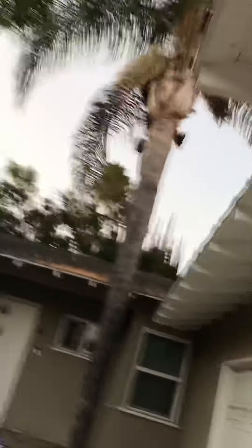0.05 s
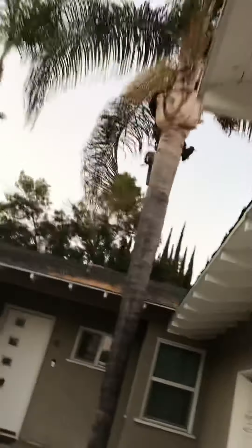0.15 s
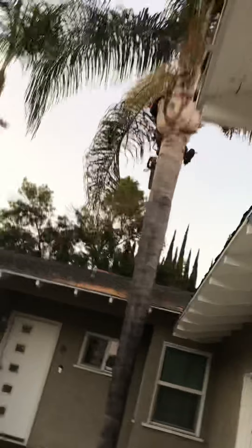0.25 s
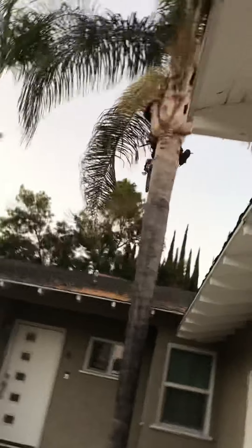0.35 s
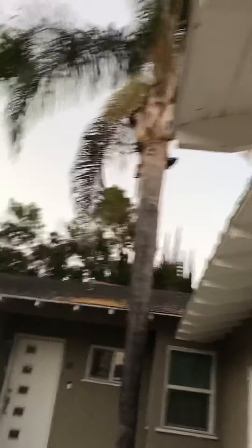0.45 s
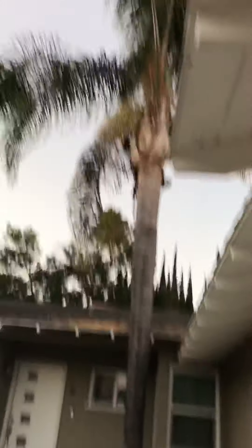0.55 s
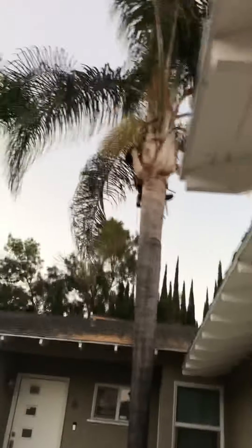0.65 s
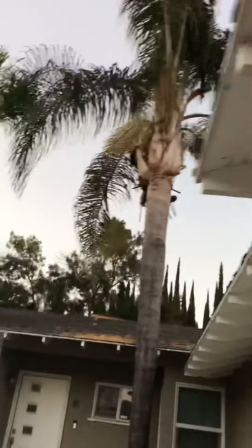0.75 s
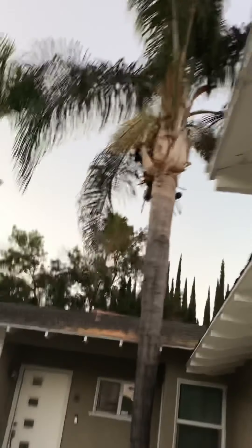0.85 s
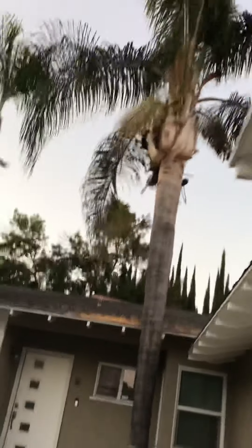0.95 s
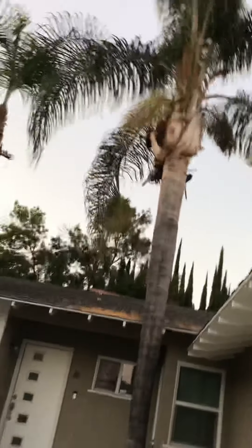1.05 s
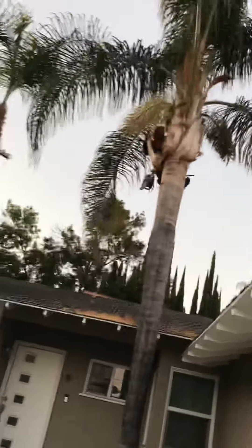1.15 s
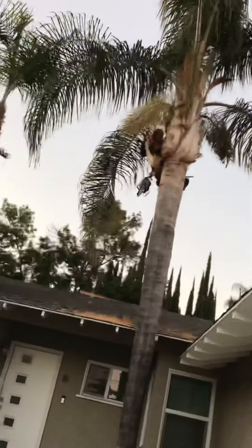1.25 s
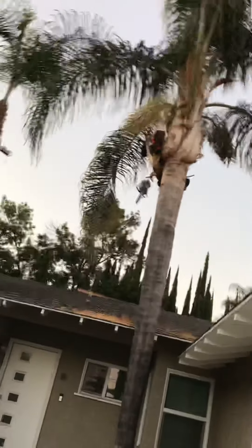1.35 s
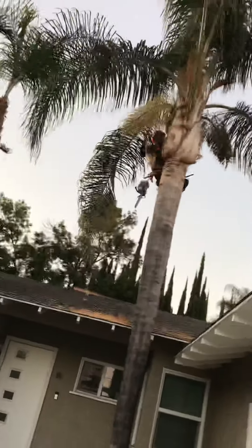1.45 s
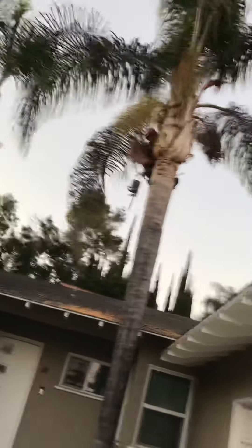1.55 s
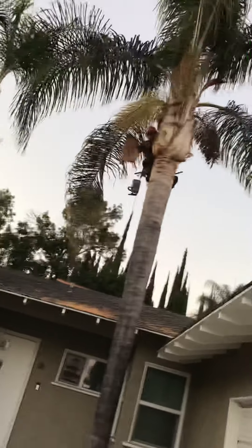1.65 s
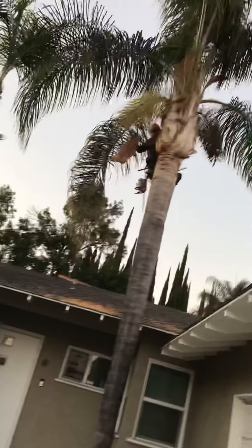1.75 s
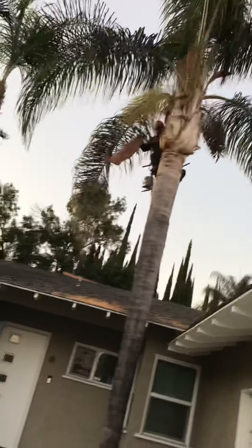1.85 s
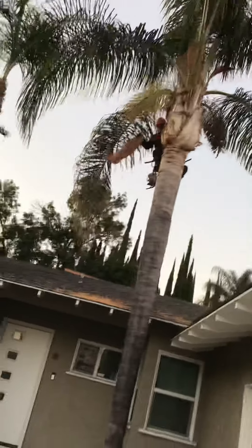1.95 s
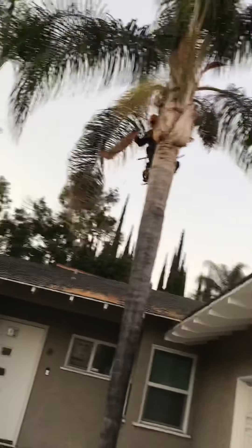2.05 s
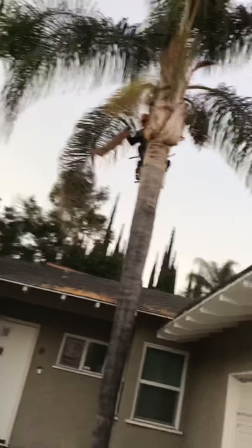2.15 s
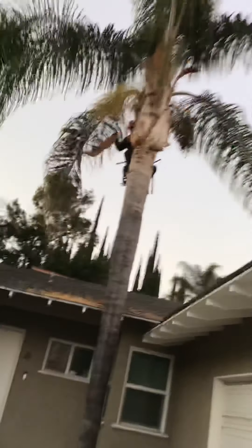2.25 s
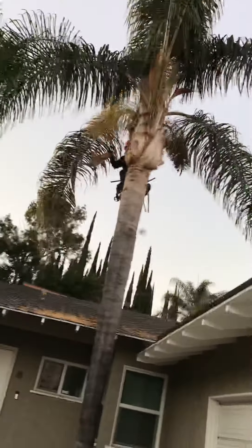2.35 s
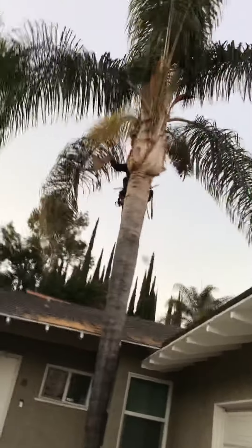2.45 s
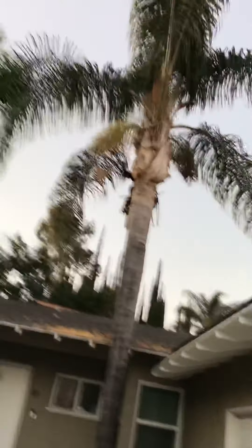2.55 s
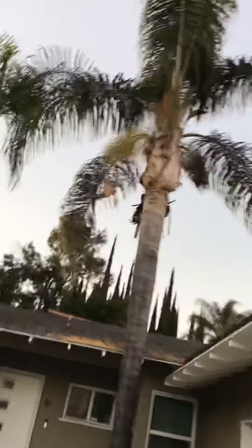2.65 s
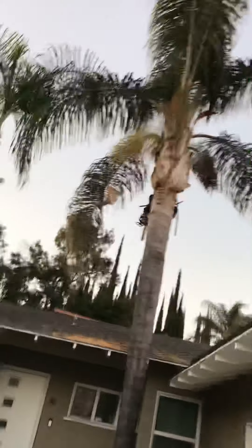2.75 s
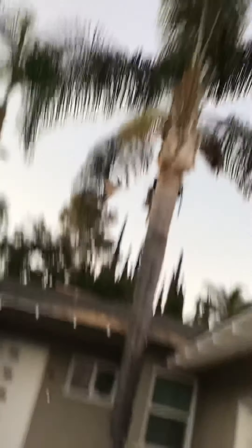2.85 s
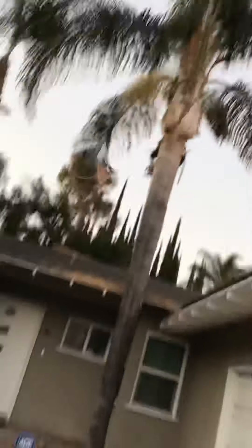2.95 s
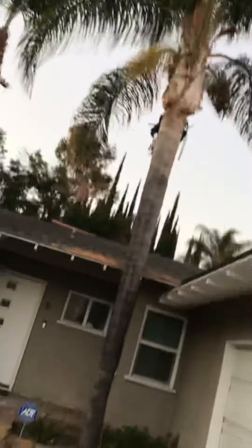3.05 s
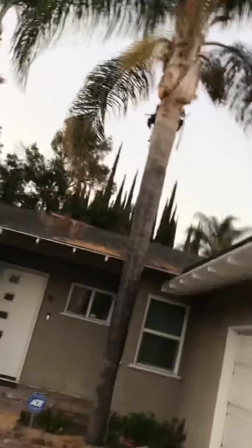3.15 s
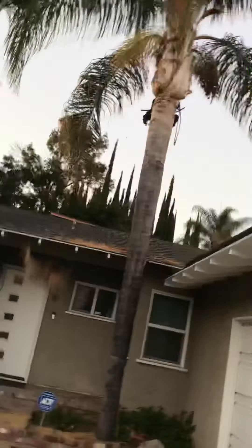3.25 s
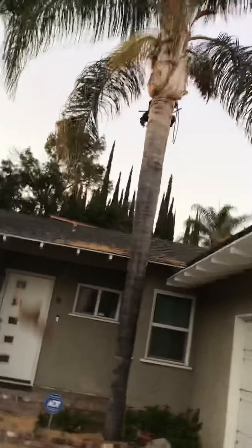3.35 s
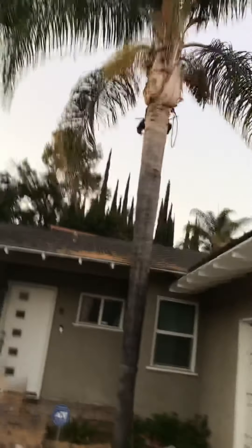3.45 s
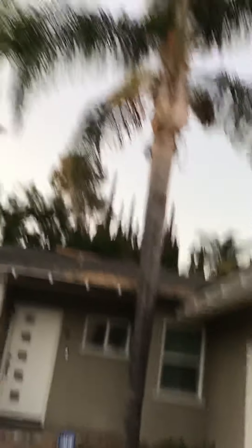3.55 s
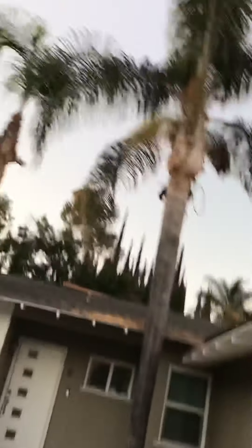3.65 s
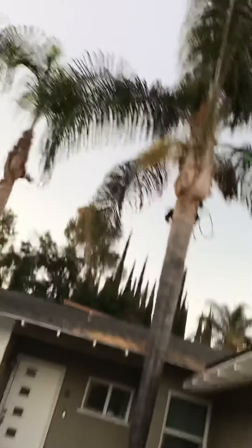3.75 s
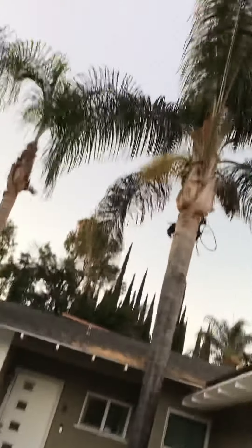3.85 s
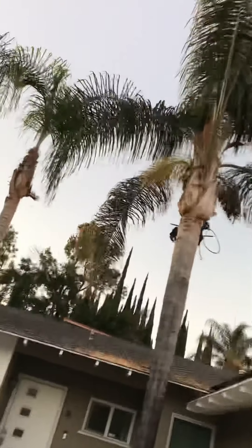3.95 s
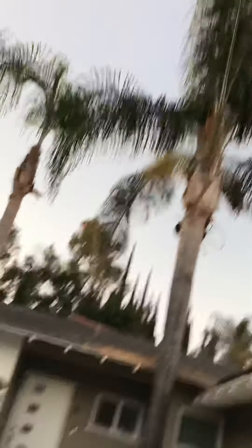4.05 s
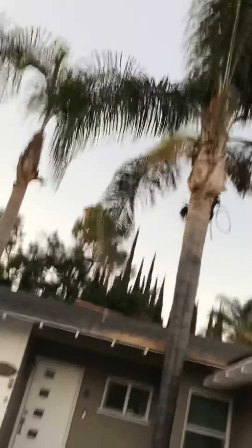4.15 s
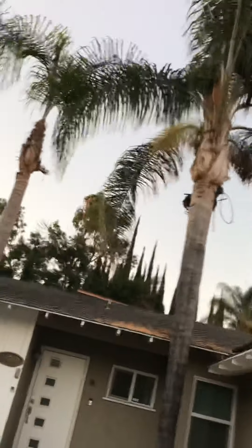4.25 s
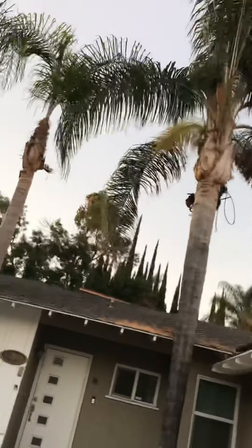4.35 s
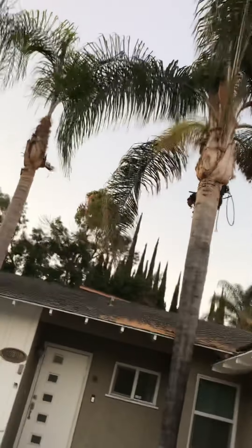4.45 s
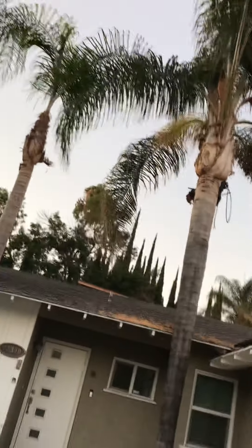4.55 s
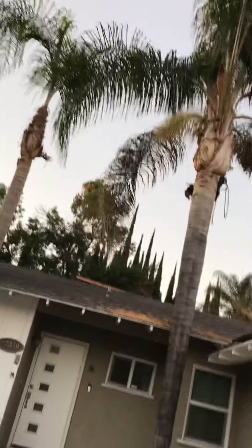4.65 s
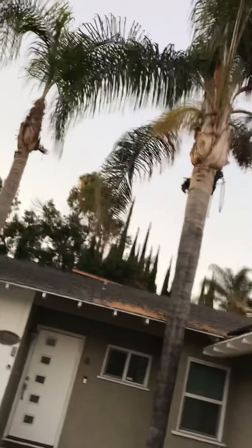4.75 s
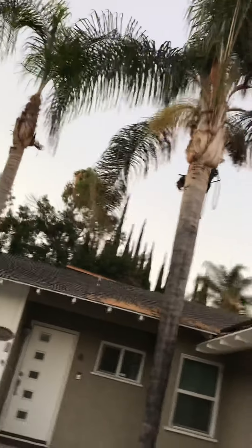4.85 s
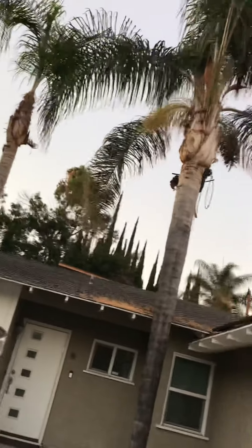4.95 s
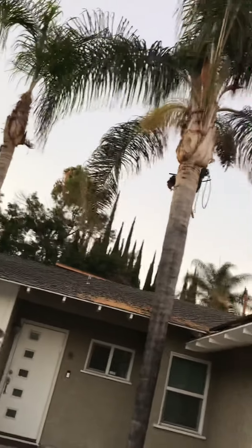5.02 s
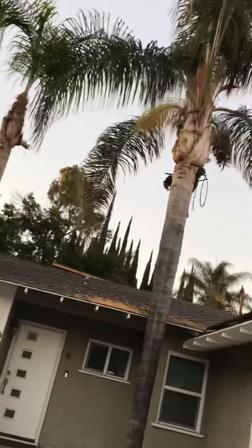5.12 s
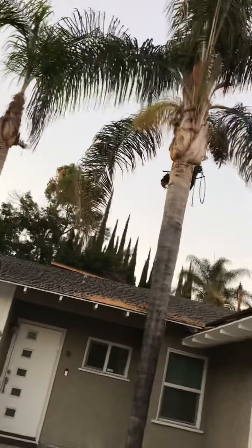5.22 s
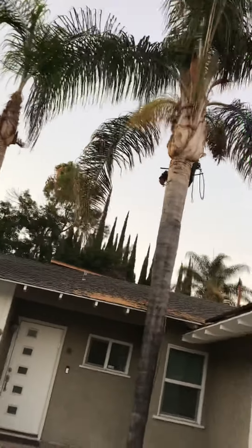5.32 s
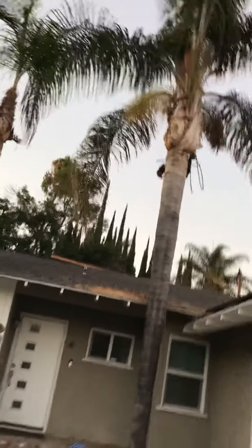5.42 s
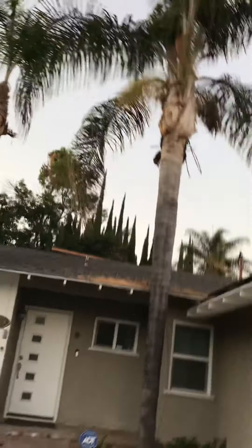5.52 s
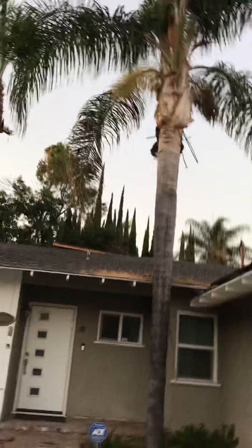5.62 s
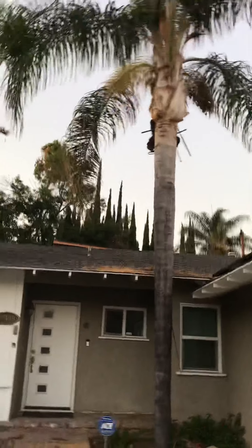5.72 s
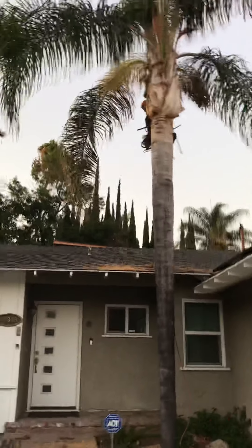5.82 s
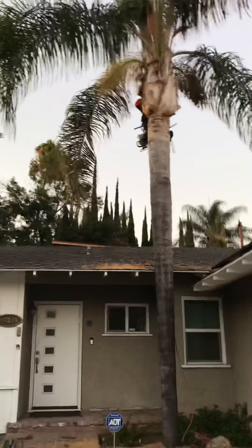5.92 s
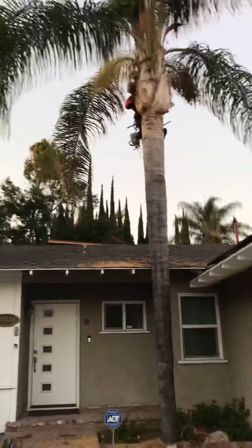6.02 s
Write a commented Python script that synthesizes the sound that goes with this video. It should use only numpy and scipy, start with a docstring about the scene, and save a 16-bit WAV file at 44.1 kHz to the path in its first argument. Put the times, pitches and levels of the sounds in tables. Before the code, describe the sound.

Outdoors in a house yard, a phone hears dry palm leaves hissing and ticking above faint traffic rumble. Fibres scrape and snap sharply as a frond base is torn loose. A very loud, crunchy woody crash lands close by, followed by a hollow bounce thud, leafy rustling that fades, and a few last cracks. Walls return short echoes.

```python
"""Palm frond torn off and dropped

A trimmer high in a palm tears a dry frond base off the trunk: leaves hiss and tick, fibres scrape and snap.
The woody piece crashes down beside a house, bounces with a hollow thud and settles among dry leaves.
Rustle, scrapes, snaps and faint crackles are shaped noise, one crackle being handling or clothing close by;
each blow is a short push, a ringing husk and a noisy crunch.
Walls and eaves throw back short echoes; traffic, made of filtered noise, rumbles far off."""
import sys
import numpy as np
from scipy import signal
from scipy.fft import rfft, irfft
from scipy.io import wavfile

SR = 44100
rng = np.random.default_rng(int(sys.argv[2]) if len(sys.argv) > 2 else 0)


def to_wav(sig):
    """Store sig (one row per channel, or 1-D mono) as 16-bit WAV at the path in sys.argv[1].

    Samples outside -1..1 are clipped; the rate is SR.
    """
    pcm = np.clip(np.atleast_2d(sig), -1, 1) * 32767
    pcm = np.round(pcm).astype(np.int16)
    wavfile.write(sys.argv[1], SR, pcm.T)  # frames by channels


N = 268172
T = np.arange(N) / SR  # time in s
LANDING_S = 3.65  # the crash on the ground

# the frond dragging over bark or ground, its leaflets swishing along; both levels are before flutter
# [height of the stroke t/s, husk level/dB, centre f/Hz, rise t/s, fall t/s, leaflet level/dB]
SCRAPES = [(.019, -59, 1720, 0.069, .049, -49), (.19, -54, 1520, 0.11, 0.054, -49.5),
           (.53, -57, 1550, 0.093, 0.39, -57.5), (.675, -41.5, 890, .022, 0.032, -48),
           (.712, -48.5, 1720, 0.024, 0.061, -42), (.995, -50, 900, 0.016, 0.022, -46.5),
           (1.45, -46.5, 790, 0.046, 0.044, -55), (1.53, -57.5, 3000, 0.099, 0.088, -54.5),
           (2.57, -55, 1000, 0.028, 0.063, -57), (2.668, -63, 1220, 0.02, 0.05, -46),
           (2.897, -47.5, 960, 0.014, 0.024, -42.5), (3.335, -48, 920, .025, 0.024, -59),
           (3.849, -43.5, 990, 0.054, 0.055, -48.5), (3.99, -46.5, 1100, 0.035, 0.057, -41.5),
           (4.2, -39.5, 1260, 0.022, 0.028, -40), (4.569, -56.5, 2070, 0.066, 0.18, -52.5)]


def undb(db):
    """Turn decibels into a plain gain."""
    return 10 ** (np.asarray(db) / 20)


def unit(x):
    """Scale x to an average (RMS) strength of 1."""
    return x / np.sqrt(np.mean(x ** 2))


def curve(rows):
    """Gain over time, drawn through rows of [t/s, level/dB]."""
    return undb(np.interp(T, *np.transpose(rows)))


def add(track, s, x):
    """Mix x into the track at time s, or at its start if s is negative."""
    i = max(int(s * SR), 0)
    track[i:i + len(x)] += x[:max(N - i, 0)]


def colour(x, points):
    """Tone filter through [f/Hz, level/dB] points, scaled to unit power gain; it never sounds early."""
    hz, db = np.transpose(points)
    size = 4096
    log_hz = np.log(np.fft.rfftfreq(size, 1 / SR) + 1)
    gain = unit(undb(np.interp(log_hz, np.log(hz), db)))
    # folding the cepstrum gives a minimum-phase filter: its energy comes as soon as it can
    cepstrum = irfft(np.log(gain))[:size // 2]
    cepstrum[1:] *= 2
    impulse = irfft(np.exp(rfft(cepstrum, size)))
    return signal.fftconvolve(x, impulse)[:len(x)]


def band(x, hz, q):
    """Broad resonance of unit power gain, centred no higher than SR / 3."""
    w = 2 * np.pi * min(hz, SR / 3) / SR
    a = np.sin(w) / (2 * q)
    passed = signal.lfilter([a, 0, -a], [1 + a, -2 * np.cos(w), 1 - a], x)
    return passed * np.sqrt((1 + a) / a)


def dull(x, hz):
    """Soften the treble above hz."""
    return signal.sosfilt(signal.butter(2, min(hz, .45 * SR), fs=SR, output="sos"), x)  # air and foliage


def walk(rate):
    """Random values, rate per second, joined by straight lines; their spread is near 1."""
    step = int(SR / rate)
    count = N // step + 2
    return np.interp(T, np.arange(count) * step / SR, rng.standard_normal(count))


def swell(t, rise, fall):
    """A stroke builds up to t = 0 and dies away."""
    return np.exp(-np.where(t < 0, (t / rise) ** 2, t / fall))


def grains(size, spread_db):
    """Dense noise grains of uneven strength, like micro-fractures."""
    strength = np.clip(rng.standard_normal(size), -2, 2)
    return unit(rng.standard_normal(size) * undb(spread_db * strength))


def fracture(time, spread_db, lead):
    """One sharp break of height lead, then splinters that die away over about time seconds."""
    t = T[:SR // 5]
    fade = np.exp(-t / max(time, 1e-4))
    x = unit(grains(len(t), spread_db) * fade) * np.sqrt(np.mean(fade ** 2))
    x[0] = lead
    return x


def stir():
    """How hard the leaflets move: the breeze, each frond stroke and the settling heap add their power."""
    # faint hiss of the crowns in the air [t/s, level/dB before flutter and trim]
    breeze = [(0, -57), (1.8, -64), (2.6, -63), (3.6, -60.5), (4.85, -71.5), (5.4, -80.5), (5.88, -71),
              (6.08, -60.5)]
    leaf_lag = 1.5  # leaflets swell and calm this many times more slowly than the stroke that moves them
    strokes = 0
    for s, _, _, rise, fall, db in SCRAPES:
        strokes = strokes + (undb(db) * swell((T - s) / leaf_lag, rise, fall)) ** 2
    # the fallen heap is shaken by the crash and comes to rest at rest_s
    heap_db, fall_db_per_s, rest_s = -43.5, 10.5, 4.82
    settling = np.clip((rest_s - T) / 0.14, 0, 1) * (T > LANDING_S)
    heap = settling * undb(heap_db - fall_db_per_s * (T - LANDING_S))
    return np.sqrt(curve(breeze) ** 2 + strokes + heap ** 2)


def leaves():
    """Leaflets brush together in a fluttering hiss, and their dry tips tick at random moments."""
    # tone of the rustle [f/Hz, relative level/dB]
    leaf_tone = [(300, -4.5), (1500, -0.5), (3500, 0), (6500, -4.5), (9000, -5), (10500, -10), (12500, -6),
                 (16000, -11)]
    ticks_per_s, tick_db = 90, -6.5  # tick level is against the hiss
    flutter = undb(1.0 * walk(60))
    tips = (rng.random(N) < ticks_per_s / SR) * rng.uniform(-0.99, 1, N)
    splinters = signal.fftconvolve(tips, fracture(.0006, spread_db=6.0, lead=4.0))[:N]
    ticks = undb(tick_db) * unit(band(splinters, 11000, q=.7) * flutter)
    rustle = colour(rng.standard_normal(N) + ticks, leaf_tone)
    return rustle * flutter * stir() * undb(-0.5)  # slight trim


def traffic():
    """A far-off rumble that wavers slightly, and the sigh of tyres: two kinds of filtered noise."""
    # tone of far traffic [f/Hz, relative level/dB]
    town_tone = [(20, -32), (35, -29), (48, -0.5), (62, 10.5), (85, -4), (125, -2.5), (165, -8),
                 (240, -8.5), (400, -14.5), (650, -16), (1000, -18.5), (1400, -19), (3000, -30),
                 (15000, -43.5)]
    # tyres on a distant road [t/s, level/dB]
    road = [(0, -63.5), (2.5, -64.5), (4.4, -56.5), (5.3, -57.5), (6.08, -56)]
    town = unit(colour(rng.standard_normal(N), town_tone)) * undb(-49.03 + .5 * walk(6))
    tyres = unit(band(band(rng.standard_normal(N), 976, q=1.8), 976, q=1.8))
    return town + tyres * curve(road)


def scrapes():
    """Rough husk catches and slips in swelling strokes of grainy noise."""
    out = np.zeros(N)
    for s, db, hz, rise, fall, _ in SCRAPES:
        t = T[:SR] - .5  # the stroke is at its height at t = 0
        rough = grains(len(t), spread_db=12.0)
        body = undb(-10.5) * band(rough, 372, q=5.2)
        tone = dull(band(rough, hz, q=1.0) + body, 9.0 * hz)
        stroke = undb(db) * swell(t, rise, fall) * tone
        cut = max(int((.5 - s) * SR), 0)  # drop what would come before time 0
        add(out, s - .5, stroke[cut:])
    return out * undb(4.5 * walk(110))  # quick random changes of strength


def snap(hz, time):
    """A sharp crack, as of a breaking fibre bundle; a lower one carries more woody body."""
    x = fracture(time, spread_db=8.0, lead=3.74)
    body = undb(-5.0) * min(3500 / hz, 1) * band(x, 670, q=0.37)
    return dull(band(x, hz, q=0.62) + body, 2.05 * hz)


def snaps():
    """Sharp cracks placed one by one: fibre bundles giving way, and one echo of such a snap from a wall."""
    # fibre bundles snapping; the row at 4.764 is a wall's echo of the snap before it
    # [t/s, level/dB, centre f/Hz, splintering t/s]
    cracks = [(0.0775, -36, 4770, .0011), (.217, -30, 5240, 0.0017), (.232, -35, 3700, 0.0043),
              (0.515, -33, 3520, 0.0013), (.522, -46, 2970, 0.0012), (0.7523, -22, 3200, 0.002),
              (0.757, -30.5, 2320, 0.0017), (.911, -35, 3310, 0.005), (0.986, -39, 4300, 0.0059),
              (1.1163, -35.5, 13000, .0032), (1.391, -44, 935, .0038), (2.201, -44.5, 1420, .0025),
              (2.6319, -36.5, 2460, 0.011), (2.656, -23, 3600, 0.0015), (2.6674, -23, 5270, 0.001),
              (2.671, -25, 4250, 0.0044), (2.869, -36.5, 1430, 0.0067), (2.8745, -28.5, 6350, 0.0029),
              (2.89, -31.5, 7260, 0.0015), (2.9936, -27, 4040, .0012), (2.996, -34, 1390, 0.0034),
              (3.055, -40, 14000, 0.00077), (4.7002, -35, 7400, .0012), (4.754, -26, 3870, 0.0018),
              (4.764, -34, 5530, 0.0025), (5.682, -48, 1990, 0.0083)]
    out = np.zeros(N)
    for s, db, hz, time in cracks:
        add(out, s, undb(db) * snap(hz, time))
    return out


def blows():
    """Each contact shoves the air, rings the hollow husk and crushes dry tissue."""
    # contacts of the frond base, several in quick succession as it crashes down
    # [t/s, knock level/dB, contact pitch f/Hz, crunch level/dB, crunch t/s]
    contacts = [(1.514, -39.5, 318, -57, .004), (1.858, -39.5, 204, -73, .004),
                (3.122, -36, 318, -54, .0052), (3.334, -35, 570, -55, .004),
                (3.613, -6.5, 1150, -13.5, .0046), (3.6152, -8.5, 540, -14.5, .002),
                (3.62, -9.5, 280, -12, .0054), (3.626, -14, 126, -34, .0028),
                (3.6337, -13, 550, -1.5, 0.0015), (3.642, -6.5, 1130, -16, 0.0061),
                (3.654, -24, 510, -9, 0.002), (3.659, -12.5, 125, -13.5, 0.0028),
                (3.6619, -7, 463, -10.5, 0.0034), (3.667, -5.5, 323, -20.5, 0.032),
                (3.9861, -7.5, 276, -58, .0078), (3.9875, -15, 650, -56, 0.025),
                (3.998, -23.5, 920, -56, .004), (4.208, -23.5, 290, -30, .002),
                (4.212, -28, 141, -55, .004), (4.598, -34, 214, -53, .004)]
    # ringing tones of the hollow woody base [f/Hz, relative level/dB, time to fade by 60 dB t/s]
    husk = [(126, -10.5, 0.13), (147, -13.5, .15), (276, -5, .25), (303, -26.5, 0.13), (449, 2, .27),
            (570, 9.5, .11), (614, 6.5, 0.085), (860, -17, 0.04), (1040, 0, 0.023), (1795, -15, 0.069),
            (2520, 2, .06), (4200, 8, .03), (4150, 4, 0.022)]
    # tone of dry tissue being crushed [f/Hz, relative level/dB]
    crushed_tone = [(150, 7.5), (520, -12.5), (750, 8.5), (1150, 4.5), (2500, 6.5), (3300, 2), (4200, 3),
                    (5200, 2), (9000, -1.5), (10500, -4), (12500, -0.5), (16000, -8.5)]
    pushes, crunch, t = np.zeros(N), np.zeros(N), T[:SR // 3]
    for s, knock_db, hz, crunch_db, time in contacts:
        # the struck wall flexes for a couple of cycles, more slowly in a softer contact
        age = hz * t / 0.46
        flex = np.sin(2 * np.pi * hz * t) * age * np.exp(1 - age)
        add(pushes, s, undb(knock_db) * flex)
        add(crunch, s, undb(crunch_db) * fracture(time, spread_db=12.0, lead=3.0))
    contact = pushes + colour(crunch, crushed_tone)
    ring = np.zeros(len(t))
    for hz, db, t60 in husk:
        ring += undb(db) * np.cos(2 * np.pi * hz * t) * np.exp(-np.log(1000) * t / t60)
    sound = contact + undb(-57) * signal.fftconvolve(contact, ring)[:N]
    # a small body radiates little deep bass
    return signal.sosfilt(signal.butter(2, 75, "high", fs=SR, output="sos"), sound)


def crackles(count=6):
    """Faint fine crackles at uneven moments, count per spell; the first is handling or clothing close by."""
    # spells of fine random crackle; the first spell is handling or clothing close by
    # [start t/s, end t/s, middle level/dB, centre f/Hz, splintering t/s]
    spells = [(2.078, 2.497, -53.5, 13100, 0.026), (4.325, 4.638, -43, 7450, .002),
              (5.61, 5.672, -58, 11800, 0.0094)]
    scatter_db = 3  # each level falls this far or less above or below the middle
    out = np.zeros(N)
    for start, end, db, hz, time in spells:
        for k, (when, strength) in enumerate(rng.random((count, 2))):
            s = start + (end - start) * (k + when) / count
            level_db = db + scatter_db * (2 * strength - 1)
            add(out, s, undb(level_db) * snap(hz, time))
    return out


def yard(x):
    """Distinct wall echoes, then scattered ones from eaves and trunks that stay longest in the bass."""
    # nearby walls [delay t/s, level/dB]
    walls = [(.0072, -15), (.0098, -10), (0.025, -17.5), (.036, -43)]
    # the yard's scattered echoes by band [centre f/Hz, level/dB, time to fade by 60 dB t/s]
    tails = [(130, -24, .36), (420, -16, .29), (1300, -10, .3), (4000, -13, .26), (11000, -17, .2)]
    t = T[:SR * 3 // 4]
    response = np.zeros(len(t))
    for hz, db, t60 in tails:
        scatter = grains(len(t), spread_db=4.0)
        fade = np.exp(-np.log(1000) * t / t60) * (1 - np.exp(-t / 0.0016))  # quick rise, slow fall
        tail = band(band(scatter, hz, q=0.94), hz, q=0.7) * fade
        response += undb(db) * tail / np.linalg.norm(tail)
    for delay, db in walls:
        response[int(delay * SR)] += undb(db)
    return signal.fftconvolve(x, response)[:N]


def scene():
    """Mix all layers; scrapes and cracks get the crown's echo before the landing, the ground's after it."""
    scratchy, knocks = scrapes() + snaps() + crackles(), blows()
    # how strongly the yard answers the crown, the litter close by and the blows
    crown_db, litter_db, blow_db = -2.5, -6, -4
    place_db = np.where(T < LANDING_S, crown_db, litter_db)
    echoes = yard(undb(place_db) * scratchy + undb(blow_db) * knocks)
    return (leaves() + traffic() + scratchy + knocks + echoes)[None]


def record(dry):
    """The phone rounds the loudest peaks and cuts the top above 16000 Hz."""
    rounded = np.tanh(dry)
    return signal.sosfilt(signal.ellip(10, .2, 80, 16000, fs=SR, output="sos"), rounded)


dry = scene()
out = record(dry)
to_wav(out)
```